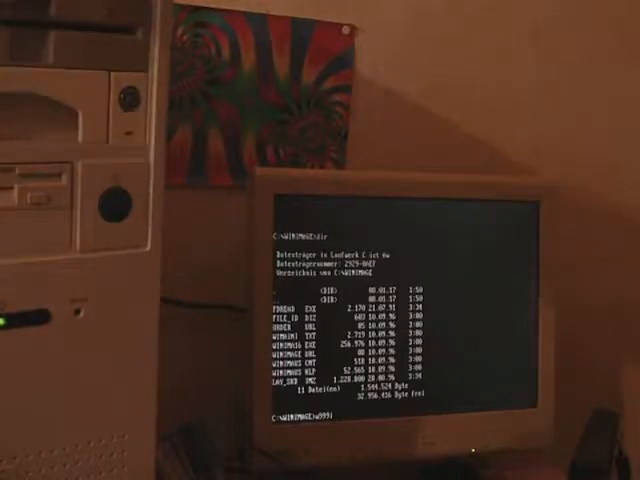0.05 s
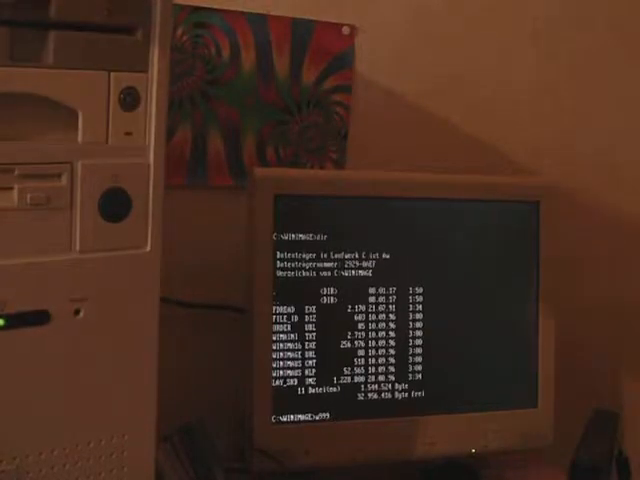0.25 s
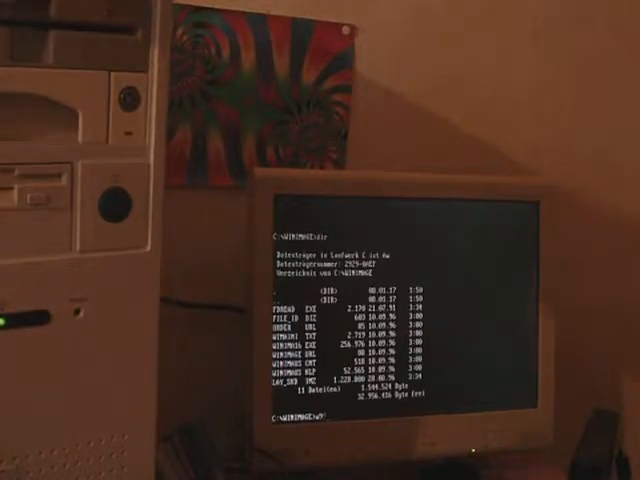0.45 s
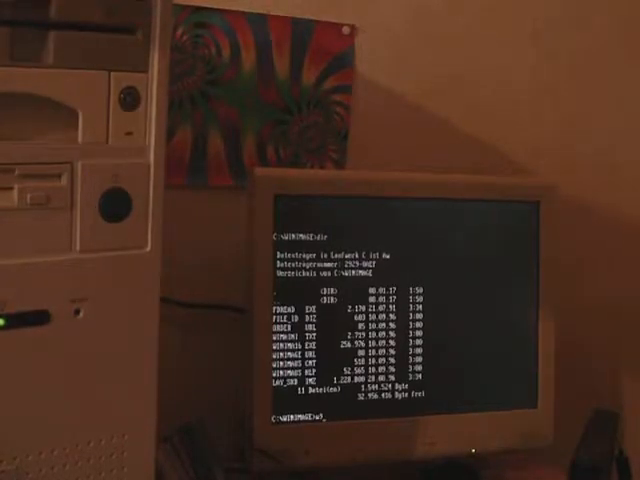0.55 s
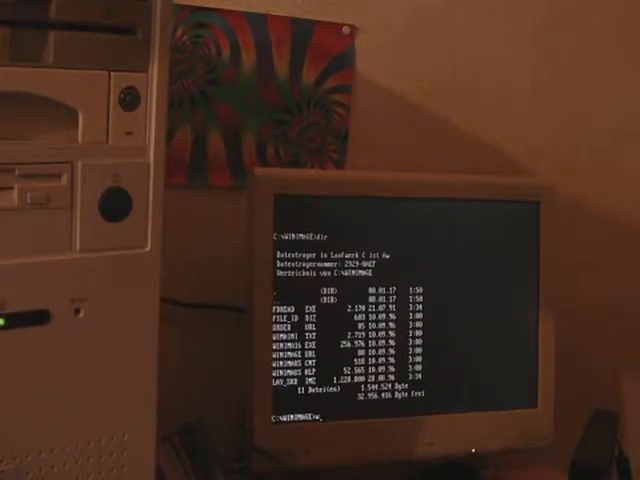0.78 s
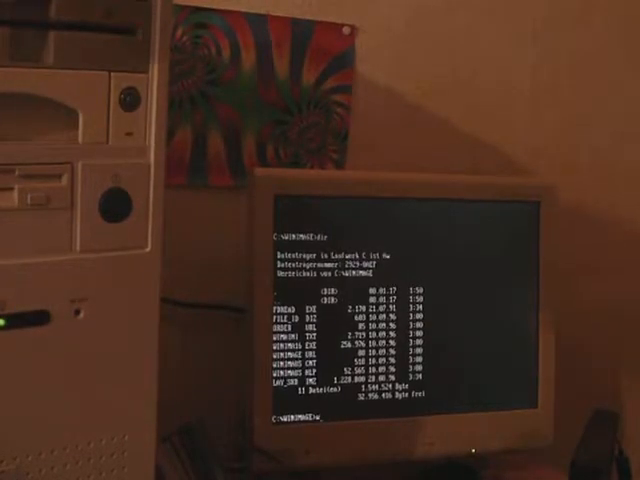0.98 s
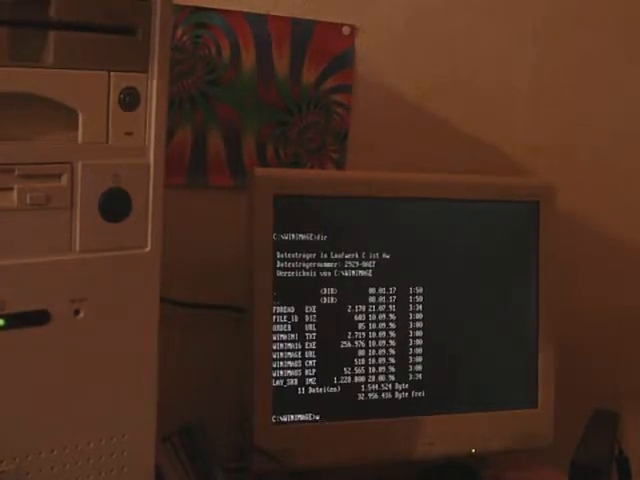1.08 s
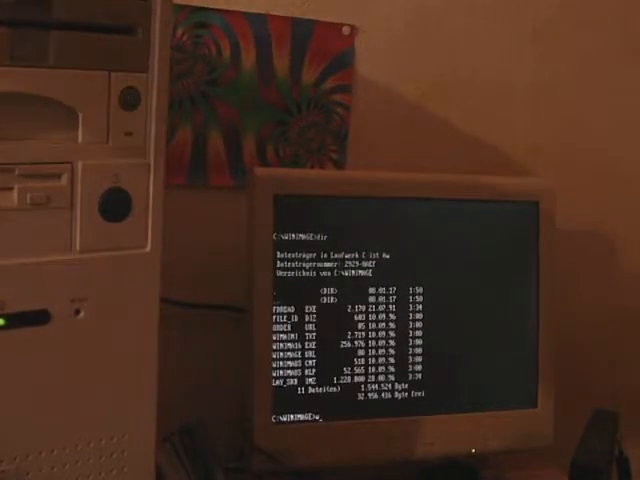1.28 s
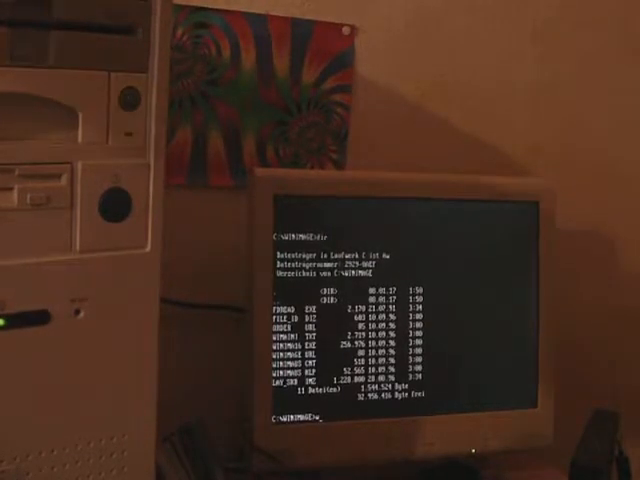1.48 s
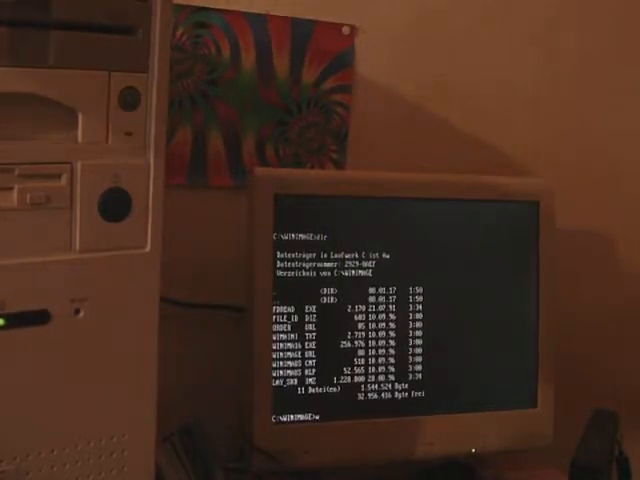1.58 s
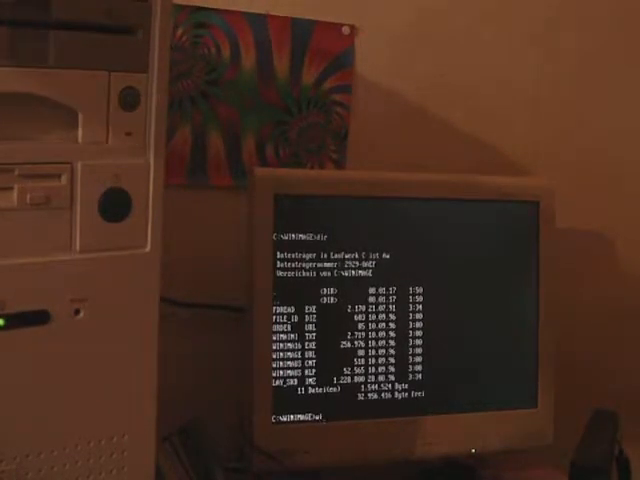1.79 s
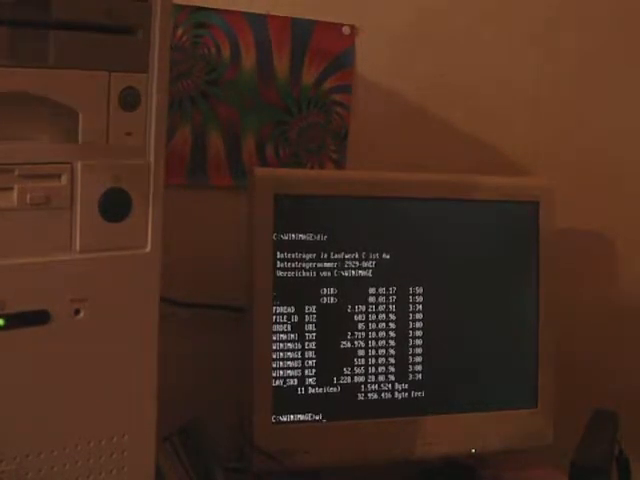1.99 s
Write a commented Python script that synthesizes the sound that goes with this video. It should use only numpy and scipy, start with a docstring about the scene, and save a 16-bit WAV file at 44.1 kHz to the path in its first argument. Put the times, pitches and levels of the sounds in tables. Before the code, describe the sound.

A short burst of plastic keyboard clicks and later faint taps, with a computer fan humming.

```python
"""Keystrokes on a plastic computer keyboard.

A few quick keystrokes in a small room, a pause, then light touches. Each key scrapes down its guide,
clacks against the bottom and rattles as it springs back; the impacts excite the modes of the case
and the reverberation of the room. A computer fan hums softly throughout."""
import sys
import numpy as np
from scipy import signal
from scipy.fft import rfft, irfft
from scipy.io import wavfile
from scipy.ndimage import uniform_filter1d

SR = 44100
rng = np.random.default_rng(int(sys.argv[2]) if len(sys.argv) > 2 else 0)


def to_wav(sig):
    """Store sig (one row per channel, or 1-D mono) as 16-bit WAV at the path in sys.argv[1].

    Samples outside -1..1 are clipped; the rate is SR.
    """
    pcm = np.clip(np.atleast_2d(sig), -1, 1) * 32767
    pcm = np.round(pcm).astype(np.int16)
    wavfile.write(sys.argv[1], SR, pcm.T)  # frames by channels


N = 90404

# Modes of the case. Each row: frequency in Hz, relative level in dB, T60 in seconds.
CASE_MODES = [(138, -24.5, 0.1), (258.4, -29, 0.68), (627, -20, 0.21), (693.7, -16.5, .22),
              (743.8, -2, 0.093), (817, -4.5, 0.043), (972, -12.5, 0.129), (1043, -29, 0.063),
              (1143, -20, 0.16), (1209, -22, .17), (1310, -14.5, 0.15), (1723, -24, .16),
              (2077, -14.5, 0.12), (2120, -16, 0.2)]
# Coherence of direct and of reverberant sound. Each row: frequency in Hz, left-right correlation.
DIRECT_COHERENCE = [(100, .99), (3000, 0.99), (6000, .85), (9000, .3), (14000, .1)]
REVERB_COHERENCE = [(100, 0.97), (700, 0.97), (1400, 0.91), (2800, 0.81), (5000, 0.27), (7500, -0.21),
                    (12000, -0.18)]


def key_presses(out, common):
    """Impact excitation: each key scrapes down and hits bottom, ringing the case and the desk."""
    # Each row: impact time in seconds, the six levels of strike() in dB, scrape length in seconds,
    # scrape level in dB.
    presses = [(0.2214, -21, -37.5, -34.5, 4, 3, 4.5, 0.012, -33.5),
               (0.3899, -18.5, -33, -30.5, 1, -9, -2.5, 0.011, -36),
               (0.5352, -12, -29, -28, -2.5, -4, 0.5, .007, -25.5),
               (0.657, -21, -33.5, -31.5, 0.5, -8, -2, 0.01, -37.5)]
    # Spectra of contact and reverberation. Each row: frequency in Hz, relative level in dB.
    clack_tone = [(100, -32), (400, -18), (750, -10), (1400, -7), (2200, 1.5), (3300, -5), (4300, 5),
                  (5300, 6.5), (7000, 7.5), (8500, -6), (10500, -21), (15500, -25)]
    tail_tone = [(60, -14), (135, -4.5), (215, -11.5), (360, -24.5), (460, -6.5), (530, -10), (630, -2.5),
                 (760, 1), (880, -3.5), (1200, 0), (1550, -4), (2100, -1.5), (3200, -9), (4200, -5.5),
                 (5200, -3), (7200, -2), (8500, -11), (10300, -22.5), (11600, -19), (15500, -35)]
    desk_thud = ring([(156.5, -24.5, 0.2)])
    for s, *levels, scrape_s, scrape_db in presses:
        add(out, s - scrape_s, amp(scrape_db) * scrape(scrape_s))
        add(out, s, strike(common, clack_tone, tail_tone, CASE_MODES, levels, 0.00084, 0.0018))
        case_db = levels[2]
        add(out, s, amp(case_db) * desk_thud)


def key_releases(out, common):
    """Elastic recoil: the spring drives each key up against its stop, and case and spring ring."""
    # Each row: impact time in seconds, the six levels of strike() in dB, scrape length in seconds,
    # scrape level in dB, spring level in dB.
    releases = [(0.1108, -42, -52, -43.5, 0, 1.1, -4.3, 0.0046, -48, -48),
                (0.3045, -33, -42.5, -37, 0, 0.4, 0.44, 0.01, -41.5, -38),
                (.4492, -30, -39.5, -34, 0, 0, 0.72, 0.0048, -34, -48.5),
                (0.5989, -29.5, -38.5, -32.5, 0, 0, 1, 0.0066, -37, -34),
                (0.7093, -32.5, -40.5, -35.5, 0, 2.2, 3.1, 0.0073, -43, -38.5)]
    # Spectra of contact and reverberation. Each row: frequency in Hz, relative level in dB.
    clack_tone = [(100, -32), (400, -20), (750, 3.5), (1400, -38), (2200, 1), (3200, -2.5), (4500, 1.5),
                  (7300, 7.5), (8500, -24), (10300, -18), (11700, -10.5), (15500, -16)]
    tail_tone = [(60, -16), (135, -3.5), (250, -16), (300, -14.5), (480, -3.5), (550, -9.5), (650, -10.5),
                 (820, 0), (1100, -6.5), (1600, -5.5), (2200, -12), (3200, -11.5), (4500, -5), (6000, -8.5),
                 (8200, -1.5), (8900, -19), (10600, -22.5), (11600, -15), (13000, -27.5), (15500, -24)]
    # Each row: frequency in Hz, relative level in dB, T60 in seconds.
    spring_modes = [(2130, -32, 0.053), (4380, 3, 0.048), (5940, -6.5, 0.091), (7300, -11, 0.056),
                    (8150, -16.5, 0.051)]
    for s, *levels, scrape_s, scrape_db, spring_db in releases:
        add(out, s - scrape_s, amp(scrape_db) * scrape(scrape_s))
        add(out, s, strike(common, clack_tone, tail_tone, CASE_MODES, levels, 0.0017, 0.0033))
        add(out, s, amp(spring_db) * ring(spring_modes))


def light_touches(out, common):
    """Free vibration: a finger nudges a loose keycap, which rings briefly along with the key deck."""
    # Each row: start in seconds, the six levels of strike() in dB, cap pitch in Hz, cap level in dB.
    touches = [(0.027, -32, -48, -43.5, 2, -1, -17, 2450, -35),
               (.0462, -32, -58, -51, -24, -7, -12, 6900, -42),
               (0.0483, -39, -45, -57, -6.5, 2.5, -9, 4340, -42.5),
               (.0708, -41, -53.5, -67, -3, 5, -11, 6950, -64), (.6888, -48, -56, -60, -3, 3, 1, 4360, -40),
               (0.8228, -49, -57.5, -55, -5.5, 0.5, -9, 4470, -52.5),
               (1.6655, -42, -53.5, -59, 3, 4, 7, 2200, -43),
               (1.7399, -43, -55.5, -53, -3, 9.5, 11.5, 5720, -38),
               (1.7547, -36.5, -50, -55, -3, -16, -3, 1925, -42),
               (1.8266, -46, -60, -53.5, 2, -5, -8, 2430, -60),
               (1.8465, -34, -43.5, -38, -1, -3.5, 0.5, 1364, -40)]
    # Spectra of contact and reverberation. Each row: frequency in Hz, relative level in dB.
    tick_tone = [(100, -33), (400, -21), (800, -8), (1100, -13), (1400, -7), (1750, 2), (2450, 4.5),
                 (3300, -2), (4300, -5.5), (5600, -2), (7000, 3.5), (9000, -7.5), (11000, -12),
                 (15500, -19)]
    tail_tone = [(60, -7.5), (350, -12), (650, -0.5), (820, 1), (1100, -4), (1400, -4), (1750, -2),
                 (2400, 4.5), (3500, -6), (5000, -5.5), (7200, -4.5), (8200, -5.5), (9300, -6),
                 (10500, -20), (11600, -23), (15500, -25)]
    # Each row: frequency in Hz, relative level in dB, T60 in seconds.
    deck_modes = [(763, -8, 0.094), (840, -9.5, 0.18), (1344, -18.5, 0.27), (2580, -11.5, 0.034),
                  (7160, -4, 0.049)]
    cap_t60_s = 0.025
    for s, *levels, cap_hz, cap_db in touches:
        add(out, s, strike(common, tick_tone, tail_tone, deck_modes, levels, 0.00095, 0.0012))
        add(out, s, ring([(cap_hz, cap_db, cap_t60_s)]))


def strike(common, contact_tone, tail_tone, modes, levels, rise_s, decay_s):
    """Superposition: one blow is the sum of contact noise, reverberation and ringing modes."""
    contact_db, tail_db, modes_db, mids_db, treble_db, top_db = levels
    key_tone = [(900, 0.005), (2300, mids_db), (6000, treble_db), (11000, top_db)]
    out = amp(tail_db) * colour(reverberation(common), tail_tone, key_tone)
    add(out, 0, amp(contact_db) * colour(contact(rise_s, decay_s), contact_tone, key_tone))
    add(out, 0, amp(modes_db) * ring(modes))
    return out


def contact(rise_s, decay_s, size=1024):
    """A brief force has a broad spectrum: plastic chatters for a few milliseconds."""
    t = np.arange(size) / SR
    envelope = np.minimum(t / rise_s, 1) * np.exp(-np.maximum(t - rise_s, 0) / decay_s)
    spectrum = rfft(noise(DIRECT_COHERENCE, size) * envelope)
    magnitude = np.sqrt(np.mean(abs(spectrum) ** 2, axis=0) + 1e-12)
    whitened = irfft(spectrum / magnitude, size)
    burst = unit(whitened * np.sqrt(envelope))  # whitening smears the burst, so it is shaped again
    return burst * np.sqrt(np.mean(envelope ** 2))


def ring(modes, size=16384):
    """Modal vibration: damped sinusoids (Hz, dB, T60 in seconds), neighbours in opposite phase."""
    t = np.arange(size) / SR
    wave = sum((-1) ** k * amp(db - 60 * t / t60) * np.sin(2 * np.pi * hz * t)
               for k, (hz, db, t60) in enumerate(modes))
    onset = 1 - np.exp(-t / 0.00023)
    return np.tile(wave * onset, (2, 1))


def scrape(length_s, rise_s=0.0039, grain_db=4, size=1024):
    """Sliding friction: the key stem rubs grainily along its guide just before it lands."""
    # Each row: frequency in Hz, relative level in dB.
    friction_tone = [(100, -31.5), (600, -5.5), (1500, -14.5), (2500, -4), (4200, 0), (5500, -2.5),
                     (7100, 0.5), (8500, -5), (10500, -19), (15500, -16)]
    t = np.arange(size) / SR
    grain = unit(amp(grain_db * wander(size, span=50)))
    envelope = np.minimum(t / rise_s, 1) ** 2 * np.exp(-np.maximum(t - length_s, 0) / 0.00067)
    return colour(noise(DIRECT_COHERENCE, size) * grain * envelope, friction_tone)


def reverberation(common, shared=0.63, build_s=0.0015, early_gain=0.74, early_s=0.0096):
    """Dense reflections, partly common to all keys, decay exponentially at each band's own rate."""
    # Each row: frequency in Hz, reverberation time in seconds.
    room_t60 = [(120, 0.12), (400, 0.21), (800, 0.25), (2000, .21), (4500, 0.18), (8000, 0.19),
                (14000, 0.22)]
    size = common.shape[1]
    t = np.arange(size) / SR
    source = np.sqrt(shared) * common + np.sqrt(1 - shared) * noise(REVERB_COHERENCE, size)
    hz, frame_s, bands = signal.stft(source, SR, nperseg=256)
    decay = amp(-60 * frame_s / read(room_t60, hz)[:, None])
    tail = signal.istft(bands * decay, SR)[1][:, :size]
    build_up = 1 - np.exp(-t / build_s)
    desk_boost = 1 + early_gain * np.exp(-t / early_s)
    return tail * build_up * desk_boost


def keyboard():
    """Interchannel level difference: the keys' upper treble, around 7 kHz, sounds louder on the left."""
    # Each row: frequency in Hz, left minus right level in dB.
    left_lead = [(100, -1), (900, 0), (4000, 0), (5300, -3.5), (6300, 1.5), (7200, 7), (8300, 6),
                 (10000, 3), (13000, -1.5)]
    out = np.zeros((2, N))
    common = noise(REVERB_COHERENCE, size=16384)  # reflections that all keys share
    key_presses(out, common)
    key_releases(out, common)
    light_touches(out, common)
    lead_db = read(left_lead, bins(2 * N))
    balance = amp([lead_db / 2, -lead_db / 2])
    return irfft(rfft(out, 2 * N) * balance)[:, :N]


def fan(air_db=-59, flicker_db=1.0, hum_gain_db=1.5, waver_hz=3):
    """Broadband and tonal fan noise: a slightly uneven rush of air with faint wavering tones."""
    # Each row: frequency in Hz, relative level in dB.
    air_tone = [(15, 7), (30, -4), (45, -8), (62, -2.5), (88, -15), (120, -9), (165, -5.5), (240, -12),
                (420, -12), (600, -14), (780, -17.5), (1200, -21), (2500, -23.5), (5000, -26), (7800, -25),
                (9000, -28.5), (14500, -27), (15500, -35.5)]
    hum_tones = [(118.4, -76.5), (414.5, -78), (592.2, -81)]
    # Each row: frequency in Hz, left-right correlation.
    air_coherence = [(30, 0.35), (120, 0.56), (400, 0.72), (1500, .55), (4000, 0.19), (12000, 0.13)]
    air = irfft(rfft(noise(air_coherence, N)) * amp(read(air_tone, bins(N))), N)
    bands = signal.stft(air, nperseg=1024)[2]
    flicker = uniform_filter1d(rng.standard_normal(bands.shape[1:]), size=10, axis=0)  # over frequency
    flicker = unit(uniform_filter1d(flicker, size=6, axis=1))  # over time
    air = unit(signal.istft(bands * amp(flicker_db * flicker))[1][:, :N])
    hum = 0
    for hz, db in hum_tones:
        pitch_hz = hz + waver_hz * wander(N, span=3000)
        hum = hum + amp(db) * np.sqrt(2) * np.sin(2 * np.pi * np.cumsum(pitch_hz) / SR)
    return amp(air_db) * air + amp(hum_gain_db) * hum


def noise(coherence, size):
    """Partial coherence: the sum and difference of two white noises set the left-right correlation."""
    mid, side = np.exp(2j * np.pi * rng.random((2, size // 2 + 1)))
    angle = np.arccos(np.clip(read(coherence, bins(size)), -1, 1)) / 2
    mid, side = mid * np.cos(angle), side * np.sin(angle)
    return unit(irfft(np.array([mid + side, mid - side]), size))


def colour(x, tone, extra=((1, 0), (2, 0)), size=2048):
    """Minimum-phase filtering by a tone curve of unit power times an extra curve."""
    gain = unit(amp(read(tone, bins(size)))) * amp(read(extra, bins(size)))
    cepstrum = irfft(np.log(gain + 1e-6))
    cepstrum[1:size // 2] *= 2  # folding the cepstrum makes the filter causal
    cepstrum[size // 2 + 1:] = 0
    impulse_response = irfft(np.exp(rfft(cepstrum)))
    return signal.fftconvolve(x, impulse_response[None], axes=1)


def wander(size, span):
    """Random fluctuation of rms 1: noise averaged over span samples."""
    return unit(uniform_filter1d(rng.standard_normal(size), size=span))


def amp(db):
    """Decibels to amplitude ratio."""
    return 10 ** (np.asarray(db) / 20)


def unit(x):
    """Normalisation to rms 1."""
    return x / np.sqrt(np.mean(x ** 2) + 1e-20)


def read(points, hz):
    """Interpolation on a log-frequency axis."""
    f, value = np.transpose(points)
    return np.interp(np.log(hz + 1), np.log(f + 1), value)


def bins(size):
    """Frequencies of a spectrum in Hz."""
    return np.fft.rfftfreq(size, 1 / SR)


def add(mix, s, sound):
    """Superposes a stereo sound on the mix at s seconds."""
    part = mix[:, max(round(s * SR), 0):][:, :sound.shape[1]]
    part += sound[:, :part.shape[1]]


def scene():
    """Sound pressures add: the keyboard over the surrounding fan."""
    return keyboard() + fan()


def record(dry):
    """Band limiting: a linear-phase low-pass removes the highest treble."""
    cutoff_hz = 15600
    lowpass = signal.firwin(255, cutoff_hz, window=("kaiser", 8), fs=SR)
    return signal.oaconvolve(dry, lowpass[None], "same")


dry = scene()
out = record(dry)
to_wav(out)
```